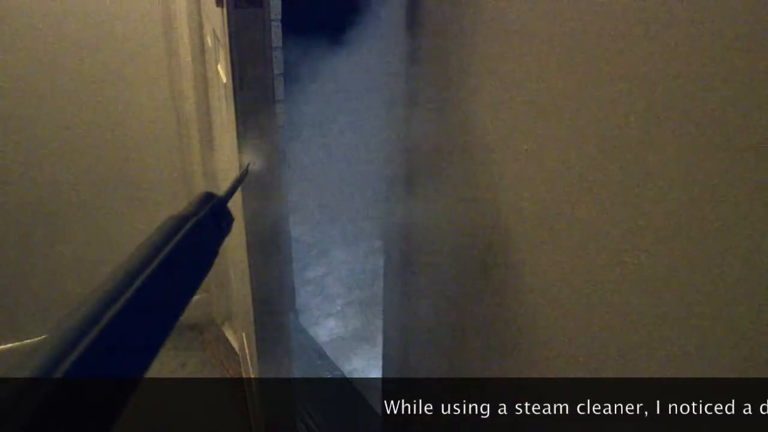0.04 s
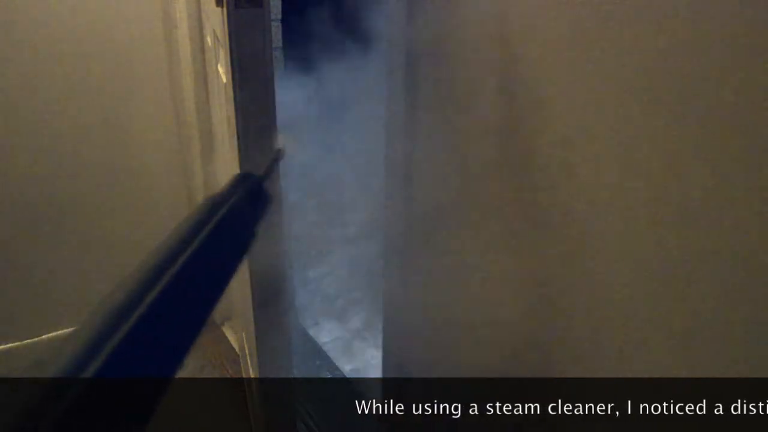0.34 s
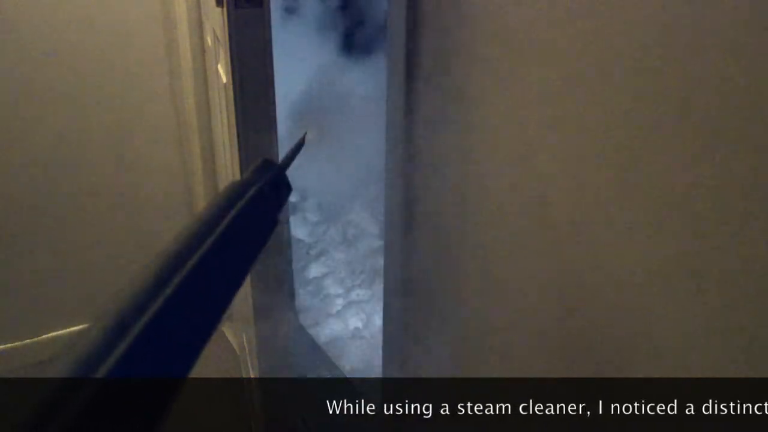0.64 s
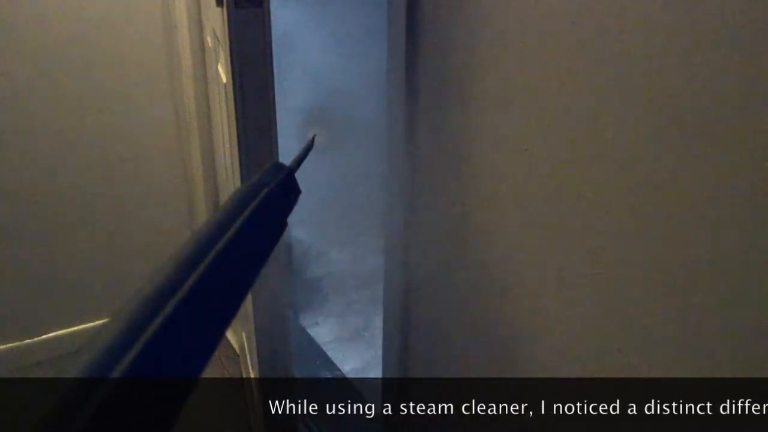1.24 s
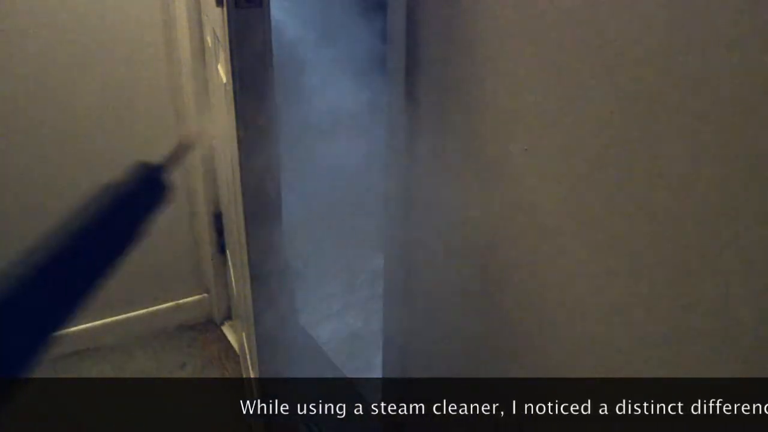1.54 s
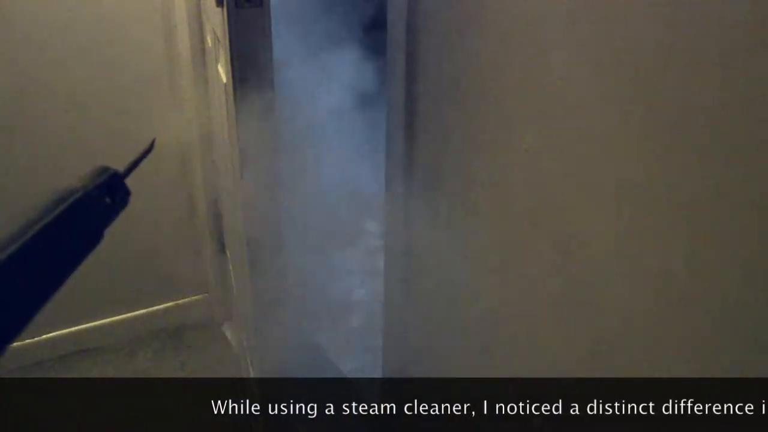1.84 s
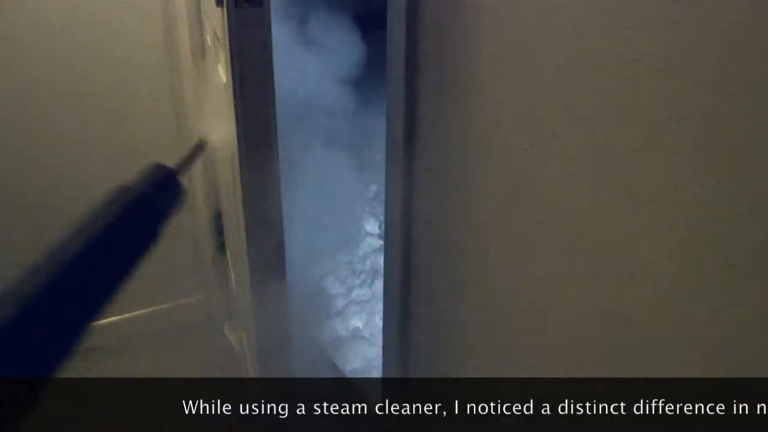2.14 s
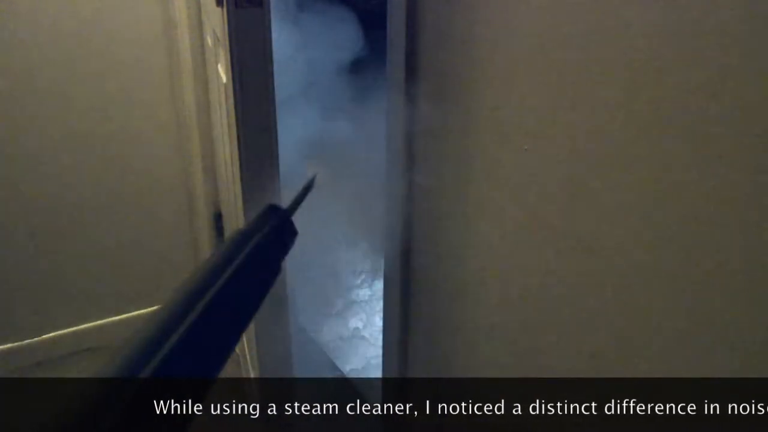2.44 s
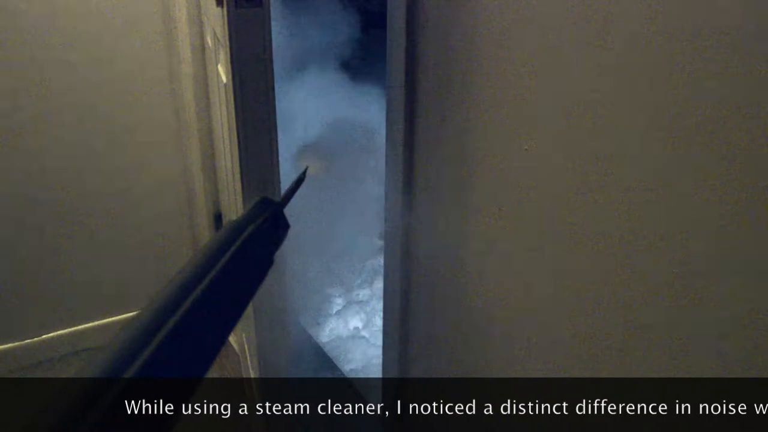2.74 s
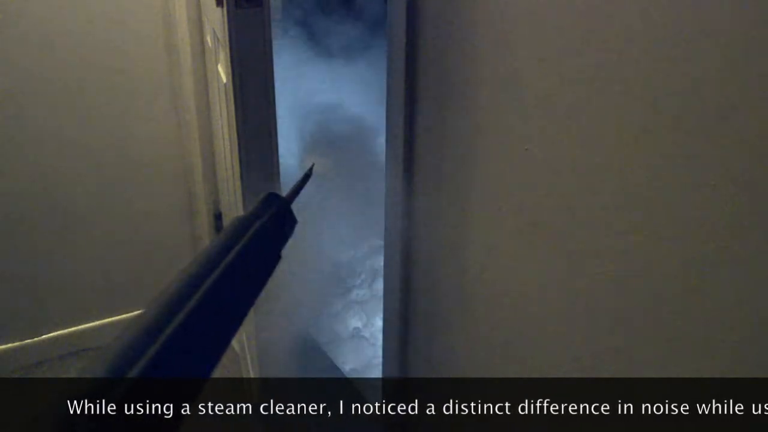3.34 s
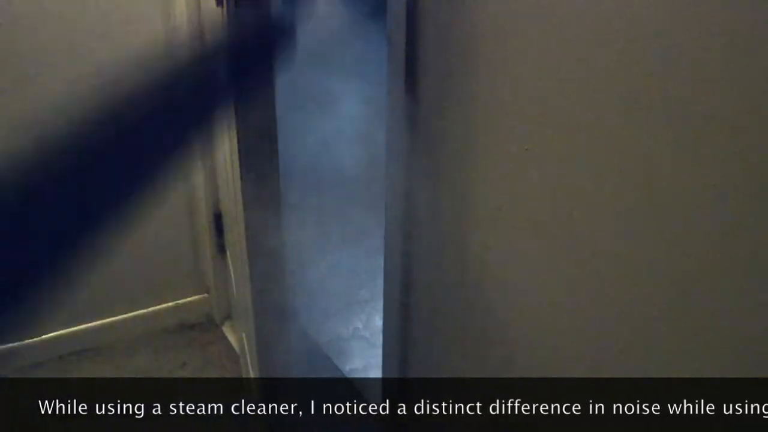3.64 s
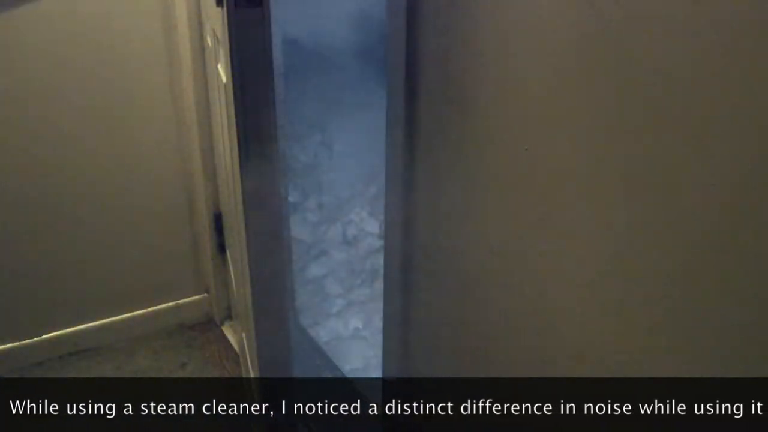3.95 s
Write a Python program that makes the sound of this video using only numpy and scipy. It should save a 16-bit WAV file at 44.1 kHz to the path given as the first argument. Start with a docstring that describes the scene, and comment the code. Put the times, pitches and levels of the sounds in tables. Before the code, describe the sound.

A steam cleaner nozzle hisses loudly throughout, close by in a small hallway, rushing through a door gap with faint breathy whistles. A hollow roar from the door edge flutters around 0.5 seconds and drops away at about 1.5 seconds, leaving the high hiss. The roar returns just after 2 seconds and falls away again near 3.9 seconds. A faint hum and low rumble lie underneath.

```python
"""A steam cleaner nozzle blowing into the gap of a door, close to one microphone in a small hallway.
The free jet hisses; where it strikes the door edge it roars, coloured by the gap and the hollow
behind it. Steam rushes through the gap, with faint whistles. Twice the nozzle swings aside and
the roar drops away. Mains hum and a low rumble lie underneath."""
import sys
import numpy as np
from scipy import signal
from scipy.fft import rfft, irfft
from scipy.io import wavfile
from scipy.ndimage import uniform_filter1d, minimum_filter1d

SR = 44100
rng = np.random.default_rng(int(sys.argv[2]) if len(sys.argv) > 2 else 0)


def to_wav(sig):
    """Store sig (one row per channel, or 1-D mono) as 16-bit WAV at the path in sys.argv[1].

    Samples outside -1..1 are clipped; the rate is SR.
    """
    pcm = np.clip(np.atleast_2d(sig), -1, 1) * 32767
    pcm = np.round(pcm).astype(np.int16)
    wavfile.write(sys.argv[1], SR, pcm.T)  # frames by channels


N = 176400
T = np.arange(N) / SR
HZ = np.fft.rfftfreq(N, 1 / SR)


def jet(droplets_per_s=900, spit_db=-11.5, top_hz=11500):
    """Turbulent hiss of the nozzle, peppered with tiny droplets; its top depends on where it points."""
    # loudness of the free jet: t/s, level/dB
    jet_level = [(0, -14.5), (.27, -17), (.32, -14.5), (.39, -17), (.66, -15), (.8, -16), (.9, -13),
                 (1, -15.5), (1.47, -15), (1.53, -18), (1.6, -16), (2.13, -15), (2.28, -17.5),
                 (2.38, -14.3), (2.43, -19.5), (2.48, -14), (2.54, -18), (2.72, -15.5), (3.07, -17),
                 (3.5, -15), (3.6, -13), (3.63, -18), (3.66, -14.7), (3.76, -16), (3.86, -19.5), (4, -20.5)]
    # spectrum of the hiss: f/Hz, relative level/dB
    jet_spectrum = [(300, -29.5), (700, -27.5), (1500, -24), (2400, -20), (3200, -23.5), (3700, -20.5),
                    (4500, -17.5), (5150, -17), (6000, -16.5), (7000, -10.5), (8400, -2.5), (9500, 1),
                    (10700, 1), (11400, -1), (12100, -6), (12800, -5), (14000, -10.5), (15600, -12),
                    (17500, -36)]
    # hiss above top_hz as the nozzle turns: t/s, gain/dB
    top_level = [(0, -1.5), (.3, -0.5), (.55, 0.5), (.9, -1.7), (1.35, -0.2), (1.7, 1.2), (2.15, 1.5),
                 (2.4, 0), (2.7, 0.5), (3.4, -0.8), (3.9, 1.5), (4, 2.2)]
    spit = noise() * (rng.random(N) < droplets_per_s / SR)
    spit *= amp(3.2 * np.minimum(rng.exponential(1, N), 4))  # a few droplets stand out
    spray = hallway(noise() + amp(spit_db) * unit(spit))
    hiss = unit(gap_echo(colour(spray, jet_spectrum), fade_hz=6600))
    top = irfft(rfft(hiss) * (1 + np.tanh((HZ - top_hz) / 800)) / 2, N)
    hiss += top * (amp(curve(top_level, T)) - 1)
    return hiss * amp(curve(jet_level, T) + .55 * wander(rate_hz=30))


def gap_rush(gain_db=1.5):
    """Steam squeezes through the door gap with a high rush."""
    # loudness of the rush: t/s, relative level/dB
    rush_level = [(0, -19.5), (.25, -20), (.5, -23.5), (.66, -22.5), (.68, -18.5), (.74, -19.3),
                  (1.15, -21), (1.41, -20.5), (1.62, -27), (1.7, -23.5), (1.89, -23), (2.09, -27),
                  (2.36, -17.5), (2.65, -26), (2.67, -18), (2.8, -19.5), (3.5, -20.5), (3.62, -22),
                  (3.75, -22), (3.82, -25.5), (4, -26.5)]
    # spectrum of the rush: f/Hz, relative level/dB
    rush_spectrum = [(2000, -38), (3250, -12), (3850, -5), (4600, -5), (5150, -6), (5850, .5), (6450, 0),
                     (6950, 0), (7700, 1.5), (8600, 1.5), (10000, -8), (14000, -44)]
    rush = unit(gap_echo(colour(hallway(noise()), rush_spectrum)))
    return rush * amp(gain_db + curve(rush_level, T) + .47 * wander(rate_hz=27))


def edge_roar(gain_db=-.5):
    """The jet breaks on the door edge and sounds the hollow behind it."""
    # roar as the jet meets and leaves the edge: t/s, relative level/dB
    roar_level = [(0, -29), (.45, -30), (.49, -40), (.53, -27), (.56, -39), (.585, -26), (.62, -32.5),
                  (.66, -28), (1.2, -28.5), (1.45, -30), (1.64, -44), (2.12, -57), (2.145, -34.5),
                  (2.28, -31), (2.39, -27), (2.5, -28.5), (2.64, -32.5), (2.67, -27.5), (3.15, -29),
                  (3.4, -28), (3.75, -28.5), (3.85, -30.5), (3.88, -43), (4, -52)]
    # broad spectrum of the roar: f/Hz, relative level/dB
    roar_spectrum = [(120, -30), (260, -6), (430, -14), (560, -7.5), (900, -3.5), (1020, -9.5),
                     (1350, -4.5), (1700, -1.5), (2000, 0), (2600, 0.5), (3200, -1.5), (3600, -4),
                     (4500, -7.5), (8000, -32)]
    # resonances of the hollow: f/Hz, width/Hz, gain/dB
    resonances = [(290.4, 33, 9.5), (525, 30, 11), (610, 32, 7), (691, 27, 7), (840, 31, 9.5),
                  (1095, 34, 7.5), (1153, 45, 8), (1335, 99, 13.5), (1446, 22, 11), (1587, 34, 7.5),
                  (1812, 61, 8), (1936, 32, 10), (2100, 90, 5.5), (2475, 10, 12)]
    # two cancellations in the hollow, slight lifts between them: f/Hz, width/Hz, gain/dB
    nulls = [(735, 65, -4.5), (1040, 50, 2.5), (1225, 24, 1.5), (1375, 10.4, -18)]
    hollow_db = sum(db * peak(hz, width) for hz, width, db in resonances + nulls)
    roar = unit(gap_echo(colour(noise(), roar_spectrum, hollow_db)))
    return roar * amp(gain_db + curve(roar_level, T) + .5 * wander(rate_hz=18))


def whistles():
    """Narrow bands of turbulence swell and fade as the jet changes its angle."""
    # breathy swells: centre t/s, half-length/s, f/Hz, width/Hz, level/dB
    swells = [(0.61, 0.083, 13300, 500, -28), (4.7, .06, 13050, 450, -24), (5.4, 0.14, 10750, 450, -15),
              (2.7, 0.35, 10520, 360, -24.5), (2.6, 0.43, 14650, 600, -35), (1.97, 0.66, 10100, 860, -22),
              (2.03, 0.067, 6100, 260, -35), (3.71, .06, 735, 31, -39), (3.7, 0.086, 1030, 50, -42.5),
              (3.78, 0.074, 3640, 350, -30.5), (0.17, 0.27, 1660, 270, -41), (.17, .17, 4900, 430, -31)]
    sound = np.zeros(N)
    for centre, half_length, hz, width, db in swells:
        band = unit(irfft(rfft(noise()) * peak(hz, width), N))
        sound += band * amp(db) * np.exp(-((T - centre) / half_length) ** 2)
    return sound


def gap_echo(x, fade_hz=8900):
    """A short echo across the door gap combs the sound below fade_hz; its peaks slide with the aim."""
    # comb as the aim shifts: t/s, main peak f/Hz, peak spacing/Hz, echo strength/0-1
    aim = [(0, 4790, 1900, 0.14), (.28, 4850, 1910, 0.18), (.45, 4400, 2100, 0.1), (.63, 4350, 1970, 0.28),
           (.7, 4290, 1960, 0.3), (1.38, 4300, 2000, 0.36), (1.54, 4800, 2100, 0), (1.7, 3670, 1200, 0.23),
           (1.85, 3700, 1200, 0.05), (2.08, 3770, 1220, 0.16), (2.22, 4800, 1920, 0.1),
           (2.36, 4250, 1990, 0.14), (2.63, 4110, 1840, .33), (2.68, 4060, 1860, 0.26),
           (3.48, 4070, 1865, 0.26), (3.66, 4470, 2150, 0.28), (3.82, 4200, 2490, 0.03), (4, 4330, 2000, 0)]
    hz, t, spectra = signal.stft(x, SR, nperseg=512, noverlap=384)
    strength = curve(aim, t, column=3) / (1 + (hz[:, None] / fade_hz) ** 6)
    turns = (hz[:, None] - curve(aim, t)) / curve(aim, t, column=2)
    comb = abs(1 + strength * np.exp(2j * np.pi * turns))
    return signal.istft(spectra * comb, SR, nperseg=512, noverlap=384)[1][:N]


def hallway(x, patterns=7, t60_s=.18, wet_db=-8.5, echoes_per_s=2000):
    """Direct sound plus sparse reflections, whose pattern changes as the nozzle moves."""
    t, wet = T[:SR // 3], np.zeros(N)
    decay = (t > .002) * amp(-60 * t / t60_s)
    for k in range(patterns):
        taps = rng.choice([-1., 1.], len(t)) * (rng.random(len(t)) < echoes_per_s / SR) * decay
        crossfade = np.sqrt(np.maximum(1 - abs(T / T[-1] * (patterns - 1) - k), 0))
        wet += crossfade * signal.oaconvolve(x, taps / np.linalg.norm(taps))[:N]
    return x + amp(wet_db) * wet


def room_tone(waver=.27, rumble_db=-48.5):
    """Wavering mains hum over a low rumble."""
    # partials of the hum: f/Hz, relative level/dB
    partials = [(59.7, -60), (119.7, -53.5)]
    # spectrum of the rumble: f/Hz, relative level/dB
    rumble_spectrum = [(20, -25), (45, -21), (70, -13), (100, -10.5), (135, -1.5), (195, -2), (260, -11.5),
                       (400, -9), (900, -23), (2500, -27)]
    # drift of hum and rumble together: t/s, gain/dB
    drift = [(0, 0), (.5, 3.5), (1, 1), (1.9, -1), (2.4, 2.5), (3, 1.5), (4, 2)]
    hum = np.zeros(N)
    for hz, db in partials:
        tone = np.sin(2 * np.pi * (hz * T + rng.random()))
        hum += amp(db) * unit(tone * (1 + waver * wander(rate_hz=5)))
    rumble = amp(rumble_db) * unit(colour(noise(), rumble_spectrum))
    return amp(curve(drift, T)) * (hum + rumble)


def amp(db):
    """Decibels to gain."""
    return 10 ** (np.asarray(db) / 20)


def unit(x):
    """Scales to rms 1."""
    return x / np.sqrt(np.mean(x ** 2) + 1e-20)


def curve(rows, t, column=1):
    """One column of a time table, joined by straight lines."""
    rows = np.array(rows)
    return np.interp(t, rows[:, 0], rows[:, column])


def peak(hz, width):
    """Bell over frequency: height 1 at hz, width in Hz at half height."""
    return 1 / (1 + (2 * (HZ - hz) / width) ** 2)


def colour(x, spectrum, extra_db=0):
    """Filters x by a spectrum table."""
    hz, db = np.transpose(spectrum)
    gain = amp(np.interp(np.log(HZ + 1), np.log(hz), db) + extra_db)
    return irfft(rfft(x) * gain, N)


def noise():
    """White noise."""
    return rng.standard_normal(N)


def wander(rate_hz):
    """Slow random motion, rms 1."""
    return unit(irfft(rfft(noise()) / (1 + (HZ / rate_hz) ** 4), N))


def scene():
    """All sources reach one microphone, heard in both channels."""
    mono = jet() + gap_rush() + edge_roar() + whistles() + room_tone()
    return np.array([mono, mono])


def record(dry):
    """A fast limiter catches the highest peaks at the microphone; a steep low-pass follows."""
    ceiling, cutoff_hz = .93, 15780
    gain = minimum_filter1d(ceiling / np.maximum(abs(dry).max(0), ceiling), size=129)
    limited = dry * uniform_filter1d(gain, size=129)
    lowpass = signal.firwin(701, cutoff_hz, window=("kaiser", 9), fs=SR)
    return signal.oaconvolve(limited, lowpass[None], "same")


dry = scene()
out = record(dry)
to_wav(out)
```